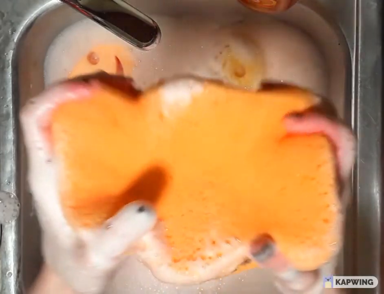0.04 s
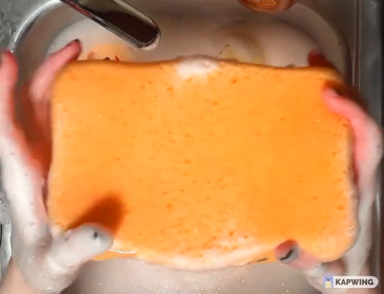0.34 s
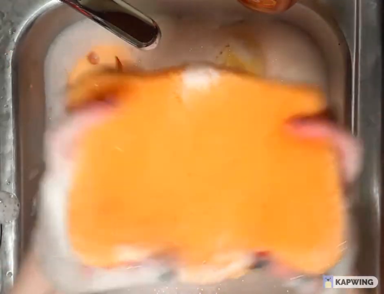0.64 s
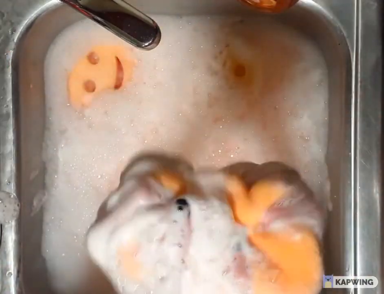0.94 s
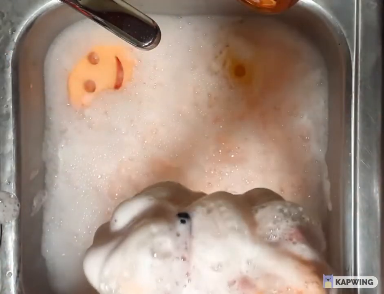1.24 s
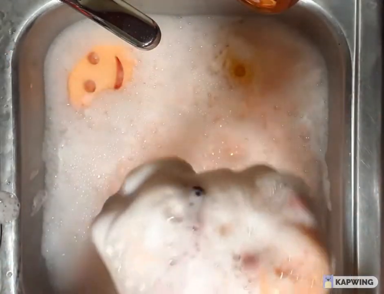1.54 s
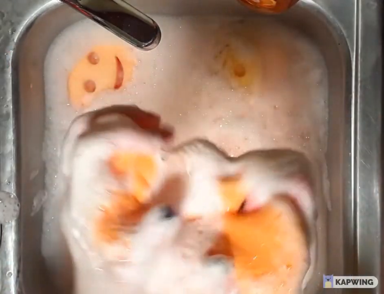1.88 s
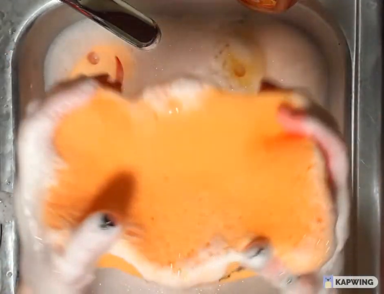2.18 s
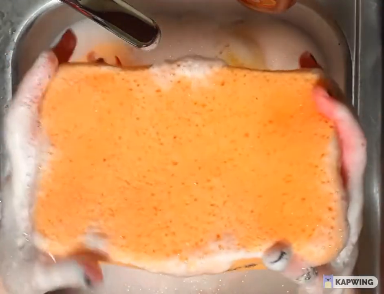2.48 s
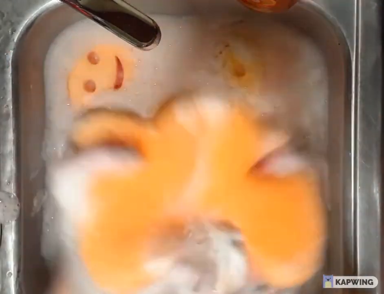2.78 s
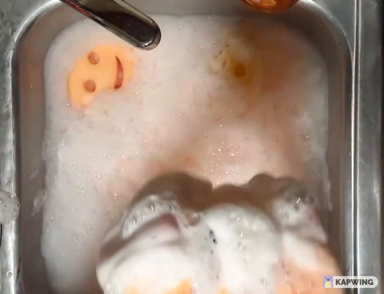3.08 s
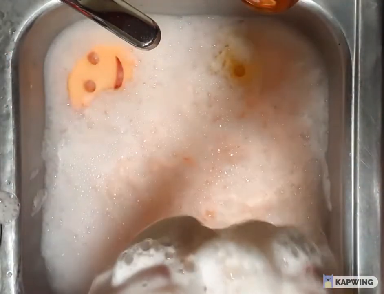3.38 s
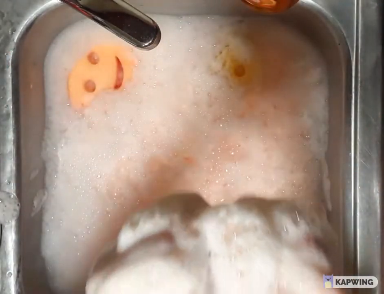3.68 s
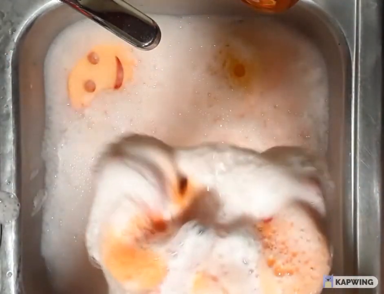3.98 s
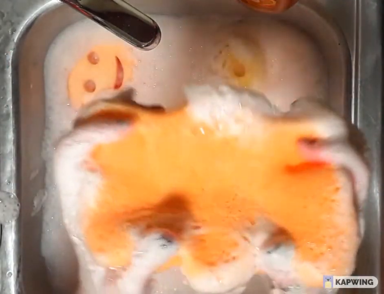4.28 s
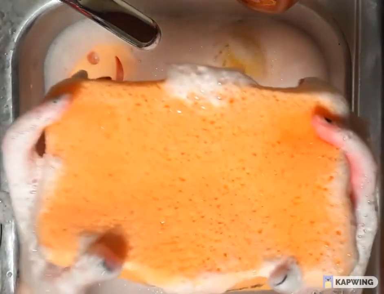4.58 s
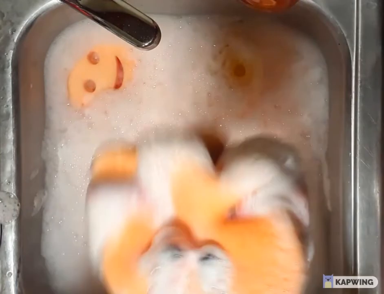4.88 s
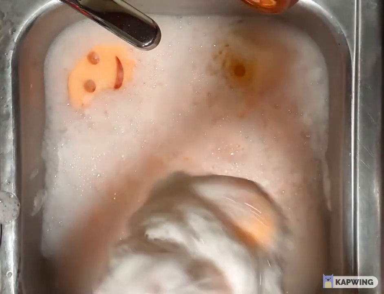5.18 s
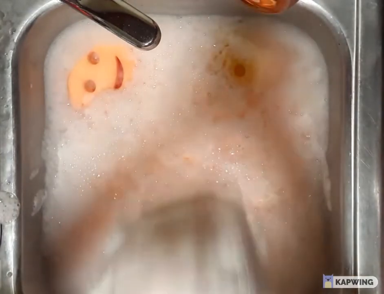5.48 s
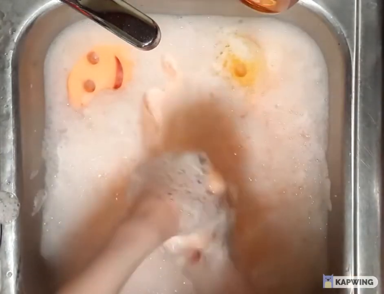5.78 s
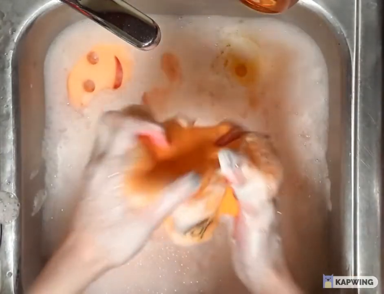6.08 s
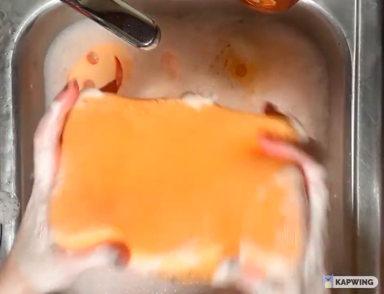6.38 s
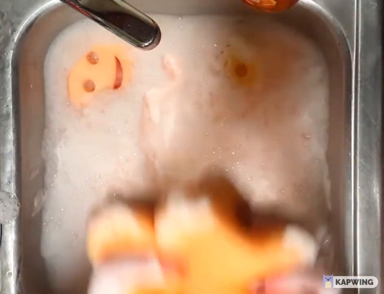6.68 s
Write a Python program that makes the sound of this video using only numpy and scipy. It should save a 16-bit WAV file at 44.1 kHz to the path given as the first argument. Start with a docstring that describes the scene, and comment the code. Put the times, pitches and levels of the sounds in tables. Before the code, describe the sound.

Close, wet squelches come about every two seconds as a sudsy sponge is pressed out four times above a steel kitchen sink. Foam fizzes and bubbles pop first, then water gurgles and fades. The sponge swells again with a quiet, crackly hiss after each of the first three squeezes. Small plops and tiny snaps fall in between, over a faint electrical hum and a little room echo.

```python
"""A soapy sponge is squeezed four times over a steel sink full of suds, and swells again in between.
Each squeeze drives out fizzing foam, then squelching bubbles and gurgling water: every bubble is a damped
oscillator, the smaller the higher. The swelling sponge sucks air with a soft hiss; once a wet fold whistles.
Air pockets burst, soap films snap and blobs of foam plop into the water. The basin's resonances colour
the sound, and a mains hum fills the slightly reverberant kitchen."""
import sys
import numpy as np
from scipy import signal
from scipy.fft import rfft, irfft, next_fast_len
from scipy.io import wavfile
from scipy.ndimage import map_coordinates

SR = 44100
rng = np.random.default_rng(int(sys.argv[2]) if len(sys.argv) > 2 else 0)


def put_to_file(sound):
    """Save the sound as 16-bit audio at rate SR, in the file named by the first command-line argument."""
    columns = np.atleast_2d(sound).T  # one column per channel
    safe = np.clip(columns, -1, 1)
    whole_steps = np.round(safe * 32767)
    wavfile.write(sys.argv[1], SR, whole_steps.astype(np.int16))


N = 306054
TIME = np.arange(N) / SR


def amp(db):
    """Amplitude ratio of a level in decibels."""
    return 10 ** (np.asarray(db) / 20)


def unit(x):
    """Normalisation to rms 1."""
    return x / np.sqrt(np.mean(x ** 2) + 1e-20)


def along(points, hz):
    """Interpolation of (frequency, value) points on a logarithmic frequency axis."""
    f, v = np.transpose(points)
    return np.interp(np.log(hz + 1), np.log(f + 1), v)


def wobble(rate):
    """Smooth random modulation: a spline through `rate` knots a second."""
    return map_coordinates(rng.standard_normal(int(N * rate / SR) + 4), [TIME * rate])


def noise():
    """Two independent channels of white noise."""
    return rng.standard_normal((2, N))


def filtered(x, response):
    """Linear filtering: the spectrum of x times a frequency response."""
    m = next_fast_len(N + SR // 2)
    return irfft(rfft(x, m) * response(np.fft.rfftfreq(m, 1 / SR)), m)[..., :N]


def band(hz, low_hz, high_hz, order=6):
    """Butterworth band-pass magnitude."""
    return 1 / np.sqrt((1 + (low_hz / (hz + 1)) ** (2 * order)) * (1 + (hz / high_hz) ** (2 * order)))


def held(start, end, attack_db_per_s, release_db_per_s):
    """Exponential growth until start, unit gain until end, then exponential decay."""
    early, late = np.maximum(start - TIME, 0), np.maximum(TIME - end, 0)
    return amp(-attack_db_per_s * early - release_db_per_s * late)


# stereo width: (frequency [Hz], side re mid [dB])
STEREO_WIDTH = [(120, -9.5), (260, -6.5), (520, -8), (720, 1), (900, -5.5), (1250, 4.5), (1700, -5.5),
                (2200, -1.5), (8700, 0), (9200, -9.5), (15000, -25)]
# stereo balance: (frequency [Hz], left re right [dB])
STEREO_BALANCE = [(120, 6), (450, 5.5), (750, 5.5), (1900, 2), (3500, 1), (8500, -2.5), (15000, -0.5)]
# resonances and notches of the basin: (frequency [Hz], width [Hz], gain [dB], left re right [dB])
BASIN_RESONANCES = [(431.4, 16, 5, 2), (616, 118, 3, 4), (725, 48, -1, -10), (860, 18, 4.5, -2),
                    (967, 26, 6.5, 4.5), (1147, 40, 5, 0), (1260, 51, 4.5, -9), (1385, 42, 4, 7.5),
                    (1679, 28, 5, -7), (1970, 90, -2.5, -8.5), (2149, 49, 2.5, 12), (2298, 45, 5, -3),
                    (2602, 73, 5, -2.5), (2805, 39, 8, 2.5), (3070, 58, 5.5, 4), (3390, 25, 5, 3.5),
                    (4150, 170, -2.5, -3), (4270, 92, 3, 2), (6030, 100, 0, 6), (7530, 280, -3, 3)]
def in_basin(pair, colour):
    """Resonant colouring: (mid, side), filtered by `colour`, meets the basin differently at each ear."""
    def spread(hz):
        angle = np.arctan(amp(along(STEREO_WIDTH, hz)))
        return colour(hz) * np.array([np.cos(angle), np.sin(angle)])

    def ears(hz):
        lift, lean = 0, along(STEREO_BALANCE, hz)
        for centre, width, db, pan in BASIN_RESONANCES:
            bell = np.exp(-((hz - centre) / width) ** 2)
            lift, lean = lift + db * bell, lean + pan * bell
        return amp([lift + lean / 2, lift - lean / 2])
    mid, side = filtered(pair, spread)
    return filtered(np.array([mid + side, mid - side]), ears)


# tones of the hum: (frequency [Hz], level [dB])
HUM_TONES = [(59.2, -60), (96.9, -72.5)]
# spectrum of the low rumble: (frequency [Hz], relative density [dB])
RUMBLE_SPECTRUM = [(20, -25), (45, -13), (70, -12.5), (105, 0), (135, -12), (190, -39.5), (500, -40.5)]
# spectrum of the room's faint rush: (frequency [Hz], relative density [dB])
RUSH_SPECTRUM = [(76, -23), (130, -12), (166, -4), (328, -8.5), (435, -13), (613, -8), (796, -22),
                 (974, -10), (1140, -1), (1520, -11.5), (1710, -17.5), (1970, -12), (4240, -43),
                 (9480, -38), (16000, -22.5)]
def kitchen():
    """Ambient noise: the line spectrum of an unsteady hum over continuous spectra of rumble and rush."""
    hum = 0
    for hz, db in HUM_TONES:
        peak = np.sqrt(2) * amp(db + 0.31 * wobble(8.4))
        hum += peak * np.sin(2 * np.pi * hz * TIME + 0.48 * wobble(3.09))
    rumble = unit(in_basin(noise(), lambda f: amp(along(RUMBLE_SPECTRUM, f))))
    rush = in_basin(noise(), lambda f: amp(along(RUSH_SPECTRUM, f)))
    rush = rush / np.std(rush.mean(axis=0)) * amp([[1.2], [-1.2]])
    return hum * amp([[2.3], [-3.2]]) + amp(-63) * rumble + amp(-67) * rush


def walls(x, t60=0.43):
    """Diffuse reverberation: convolution with a short, dull noise tail, different at each ear."""
    t = np.arange(SR // 3) / SR
    tail = rng.standard_normal((2, len(t))) * amp(-60 * t / t60) * (t > .004)
    echo = signal.fftconvolve(x, tail / np.linalg.norm(tail[0]), axes=1)[:, :N]
    return filtered(echo, lambda f: band(f, 80, 5900, order=2))


# pushes of the hands: (time [s], level [dB])
HAND_PUSHES = [(0.735, -41.5), (4.79, -49.5), (6.75, -41.5)]
def pushes(pitch_hz=104, rise_s=0.012):
    """Heavily damped oscillation: folding the sponge gives a soft, low bump."""
    bumps = np.zeros(N)
    for s, db in HAND_PUSHES:
        age = np.maximum(TIME - s, 0)
        envelope = age / rise_s * np.exp(1 - age / rise_s)
        bumps += amp(db) * envelope * np.sin(2 * np.pi * pitch_hz * age)
    return bumps * amp([[1.2], [-1.2]])


# modes of the filled sink: (frequency [Hz], level re the blob [dB], decay time T60 [s])
SINK_MODES = [(167.3, -22.5, 0.61), (215.7, -9, 0.17), (340.5, -11, 0.1), (502, -16, 0.23),
              (630, -19.5, 0.25), (748, -34, 0.14), (1030, -19, 0.14)]
# blobs falling into the water: (time [s], level [dB], cavity frequency [Hz], splash offset [dB])
FALLING_BLOBS = [(0.02, -52, 282, -3), (0.128, -56, 560, -9), (1.535, -47, 238, -13),
                 (1.655, -38.5, 239, -12), (1.714, -44, 227, -13), (1.737, -45.5, 162, -1),
                 (2.143, -54.5, 165, 2), (3.278, -43.5, 312, -6), (3.652, -55, 212, 7),
                 (5.635, -29, 317, -4), (5.67, -43, 480, -1.5), (5.843, -57, 334, 3)]
def plops(swell_cycles=1.07, rise=0.039):
    """Impact excitation: a blob slaps the suds, its cavity rings a few cycles and the sink answers."""
    ring, slap, spray = np.zeros((3, N + SR))
    t = np.arange(SR // 2) / SR
    onset = 1 - np.exp(-t / 0.0015)
    for s, db, hz, splash_db in FALLING_BLOBS:
        span = slice(int(s * SR), int(s * SR) + len(t))
        age = t * hz / swell_cycles
        cavity_phase = 2 * np.pi * hz * t * (1 + rise * np.tanh(age - 1))
        ring[span] += amp(db - 3) * age ** 2 * np.exp(2 * (1 - age)) * np.sin(cavity_phase)
        for mode_hz, mode_db, t60 in SINK_MODES:
            mode = np.sin(2 * np.pi * mode_hz * t + rng.uniform(0, 2 * np.pi))
            ring[span] += onset * amp(db + mode_db - 60 * t / t60) * mode
        slap[span] += onset * amp(db - 10.5 - 60 * t / 0.094)
        spray[span] += onset * amp(db + splash_db - 11.5 - 60 * t / 0.15)
    thud = slap[:N] * unit(filtered(noise(), lambda f: band(f, 130, 760, order=3)))
    splash = spray[:N] * unit(filtered(noise(), lambda f: band(f, 900, 4100, order=2)))
    centred_ring = np.outer([1, 0], ring[:N])
    return in_basin(centred_ring + thud + splash, lambda f: band(f, 110, 14000, order=3))


def bubbles(times, hz, strength, cycles, rise):
    """Bubble resonance as (mid, side): damped sines last `cycles` and glide up by the fraction `rise`."""
    life = (cycles / hz)[:, None]
    t = np.arange(int(min(life.max() * SR, 4e6 / len(hz)))) / SR
    age = np.minimum(t / life, 1)
    phase = 2 * np.pi * hz[:, None] * t * (1 + rise * age / 2)
    envelope = strength[:, None] * np.exp(-3 * age) * (1 - age) * (1 - np.exp(-phase / 2))
    index = ((np.abs(times) * SR).astype(int)[:, None] + np.arange(len(t))).ravel()
    leading_ear = rng.choice([-1, 1], (len(hz), 1))
    waves = np.sin(phase), leading_ear * np.cos(phase)
    return np.array([np.bincount(index, (envelope * wave).ravel(), N)[:N] for wave in waves])


# lone bubbles: (time [s], level [dB], frequency [Hz])
LONE_BUBBLES = [(0.992, -36, 840), (1.647, -52, 990), (2.891, -39, 427), (2.897, -30, 838),
                (2.902, -34.5, 651), (2.908, -31, 744), (4.289, -50, 920), (5.628, -40, 2100),
                (5.63, -37, 2510), (6.06, -54, 996), (6.096, -50, 990), (6.113, -50, 983)]
def blips():
    """Free oscillation: a single, lightly damped bubble rings with a clear pitch."""
    s, db, hz = np.transpose(LONE_BUBBLES)
    rings = bubbles(s, hz, amp(db), cycles=39, rise=0.05)
    return in_basin(rings, lambda f: band(f, 300, 9000, order=2))


# soap films snapping: (time [s], level [dB], treble offset [dB])
FILM_SNAPS = [(0.241, -44, -2), (1.106, -42, -8), (1.294, -40, -14), (3.655, -47.5, -10), (3.852, -39, -18),
              (4.103, -49, 3), (5.065, -33, -11), (5.21, -30, 1), (5.225, -33, -3), (5.25, -41, 12),
              (5.254, -35, 11), (5.262, -38, -9), (5.27, -40, -8), (5.2855, -34, 1), (5.302, -32, -4),
              (5.375, -38, -9), (5.63, -36, -9)]
def snaps(ring_hz=2620, ring_t60=0.016, ring_db=-11):
    """Impulse excitation: a film tears with a tiny spray and leaves a short ring in the basin."""
    t = np.arange(SR // 20) / SR
    burst = (1 - np.exp(-t / .0002)) * (amp(-60 * t / .008) + amp(-13 - 60 * t / .05))
    ring = amp(ring_db - 60 * t / ring_t60) * np.sin(2 * np.pi * ring_hz * t)
    body_band = signal.butter(2, [1400, 4500], "band", fs=SR, output="sos")
    pair = np.zeros((2, N + len(t)))
    for s, db, treble_db in FILM_SNAPS:
        tear = rng.standard_normal((2, len(t))) * burst
        snap = amp(-3) * signal.sosfilt(body_band, tear) + amp(treble_db - 11) * tear + ring
        pair[:, int(s * SR):int(s * SR) + len(t)] += amp(db) * snap
    return in_basin(pair[:, :N], lambda f: band(f, 700, 17000, order=2))


# air pockets bursting out of the sponge: (time [s], level [dB], centre frequency [Hz])
AIR_POCKETS = [(0.734, -16, 2230), (1.737, -31.5, 1310), (1.892, -27, 1410), (2.768, -29, 1650),
               (2.89, -21, 990), (2.9, -26, 720), (3.924, -24, 1650), (5.014, -26, 880), (5.035, -33, 800),
               (5.63, -29, 556), (6.849, -14, 2670), (6.861, -22, 2200)]
def spurts(count=24, length_s=.022, scatter=0.33, bubble_db=-23):
    """Fragmentation: each air pocket breaks into a quick cluster of resonating bubbles."""
    s, db, hz = np.repeat(AIR_POCKETS, count, axis=0).T
    delay = length_s * rng.random(len(s)) ** 1.1
    pitch_draw, level_draw = rng.uniform(-1.7, 1.7, (len(s), 2)).T
    strength = amp(db + bubble_db + 1.5 * level_draw)
    cluster = bubbles(s + delay, hz * np.exp(scatter * pitch_draw), strength, cycles=12, rise=.2)
    return in_basin(cluster, lambda f: band(f, 320, 9000, order=2))


def whistle(start_s=4.97, end_s=5.3, pitch_hz=2600, width_hz=75, level_db=-57, flutter_db=2):
    """Flow-excited resonance: air forced through a wet fold sings in a narrow, fluttering band."""
    mid, side = unit(filtered(noise(), lambda f: 1 / (1 + (2 * (f - pitch_hz) / width_hz) ** 2)))
    gate = held(start_s, end_s, attack_db_per_s=800, release_db_per_s=800)
    gain = amp(level_db + flutter_db * wobble(22)) * gate
    return gain * (mid + amp(-7) * np.array([side, -side]))


# colour of the wet foam: (frequency [Hz], gain [dB])
FOAM_COLOUR = [(150, -13.5), (250, -9), (340, -8.5), (520, -2.5), (900, 2), (1500, 2), (2700, -1),
               (4000, -4.5), (7000, -11), (8400, -7), (11700, -8.5), (16000, -17.5)]
def froth(low_hz, high_hz, per_second, cycles, rise, spread_db, blur_db):
    """Random superposition: bubbles of one size range ring over the blur of countless fainter ones."""
    when, pitch, chance = rng.random((int(per_second * N / SR), 3)).T
    hz = np.minimum(low_hz * (high_hz / low_hz) ** pitch, SR / 2)
    excess_db = spread_db * np.minimum(-np.log(1 - chance), 4)  # a few bubbles stand out
    rings = unit(bubbles(when * N / SR, hz, hz * amp(excess_db), cycles, rise))
    blur = unit(filtered(noise(), lambda f: band(f, low_hz, high_hz)))
    stream = in_basin(rings + amp(blur_db) * blur,
                      lambda f: amp(along(FOAM_COLOUR, f)) * band(f, low_hz / 2, high_hz * 2))
    return stream / np.std(stream.mean(axis=0))


# gushes: (time [s], level [dB], half length [s], slosh re the gush [dB], spray re the gush [dB])
WATER_GUSHES = [(0.04, -67.5, 0.051, -5, 7.5), (0.47, -67.5, 0.095, -14, -26), (0.99, -49, 0.012, -11, -12),
                (1.13, -51.5, 0.028, -21, -7), (2.909, -37, 0.024, -13, -24),
                (3.142, -48.5, 0.04, -25, -31), (3.856, -59, 0.023, -12, -4),
                (3.952, -52.5, 0.021, -18, -24), (4.02, -64, 0.023, -8, 6), (5.035, -38.5, 0.039, -20, -18),
                (5.255, -59.5, 0.04, -11, -1.5), (5.548, -56.5, 0.029, -20, -27), (5.65, -54, 0.02, 2, -2),
                (6.29, -73.5, 0.063, -18, 14), (6.755, -43, 0.025, -11.5, -2),
                (6.858, -41.5, 0.029, -13, -6)]
def gushing(squelch_db=-6):
    """Pulsed flow: sudsy water moves in Gaussian gushes; gains of (slosh, gurgle, squelch, fizz)."""
    gains = np.zeros((4, N))
    for s, db, half_s, slosh_db, spray_db in WATER_GUSHES:
        pulse = np.exp(-((TIME - s) / half_s) ** 2 / 2)
        gains += np.outer(amp(db + np.array([slosh_db, 0, squelch_db, spray_db])), pulse)
    return gains


# swellings of the sponge: (start [s], full [s], first level [dB], last level [dB],
# initial gurgle re the suction [dB], initial fizz re the suction [dB])
SPONGE_SWELLS = [(-0.3, 0.296, -60, -63, -0.5, -3.5), (1.724, 2.221, -56.5, -58.5, -4.5, -2),
                 (3.927, 4.38, -56, -57, -2, -2), (5.84, 6.28, -65.5, -58, -5, -0.5)]
def swelling(attack_db_per_s=285, release_db_per_s=94, pore_lag_s=0.031, drain_db=5, fizz_growth_db=1):
    """Elastic recovery: the sponge sucks, wet at first and ever drier; gains of (gurgle, squelch, fizz)."""
    gains = np.zeros((3, N))
    for start, full, first_db, last_db, gurgle_db, fizz_db in SPONGE_SWELLS:
        opened = np.clip((TIME - start) / (full - start), 0, 1)
        strength = amp(first_db + (last_db - first_db) * opened)
        suction = held(start, full, attack_db_per_s, release_db_per_s)
        pores = held(start + pore_lag_s, full, attack_db_per_s, release_db_per_s)
        lingering_foam = amp(-9.5) * held(full, full, attack_db_per_s, release_db_per_s=21.5)
        gurgle = suction * amp(gurgle_db - drain_db * opened)
        fizz = np.hypot(pores, lingering_foam) * amp(fizz_db + fizz_growth_db * opened)
        gains += strength * np.array([gurgle, suction, fizz])
    return gains


# flow pressed out of the sponge, one curve for each squeeze: (time [s], level [dB])
SQUEEZE_FLOWS = [
    [(0.58, -76), (0.672, -49.5), (0.744, -39.5), (0.874, -43.5), (0.964, -38), (1.088, -48),
     (1.124, -44.5), (1.252, -61.5), (1.294, -62.5), (1.446, -75), (1.5, -82)],
    [(2.65, -88), (2.682, -58), (2.732, -55), (2.766, -43), (2.84, -39), (2.882, -43.5), (2.89, -39.5),
     (3.046, -47), (3.15, -50.5), (3.39, -71.5), (3.5, -85)],
    [(4.7, -73.5), (4.774, -47), (4.82, -42.5), (4.828, -46), (5.022, -38), (5.084, -41.5), (5.108, -43.5),
     (5.308, -55.5), (5.312, -60), (5.36, -66)],
    [(6.56, -71), (6.606, -56.5), (6.838, -38), (6.934, -39), (6.94, -38)],
]
# change from air to water in each squeeze: (midpoint [s], length [s], fizz lost [dB], gurgle gained [dB])
AIR_TO_WATER = [(1.004, 0.45, 15, 4), (3.088, 0.28, 24, 10.5), (5.02, 0.11, 15, 3.5), (6.81, 0.12, 5, 3.5)]
def squeezing(airy_gurgle_db=-5.5, airy_fizz_db=0.5):
    """Two-phase flow: a squeeze expels airy foam first, then water; gains of (gurgle, squelch, fizz)."""
    gains = np.zeros((3, N))
    for curve, (turn_s, length_s, lost_db, gained_db) in zip(SQUEEZE_FLOWS, AIR_TO_WATER):
        s, db = np.transpose(curve)
        grip = held(s[0], s[-1], attack_db_per_s=400, release_db_per_s=127)
        flow = amp(np.interp(TIME, s, db)) * grip
        wet = (1 + np.tanh(2 * (TIME - turn_s) / length_s)) / 2
        gurgle = amp(airy_gurgle_db + gained_db * wet)
        fizz = amp(airy_fizz_db - lost_db * wet)
        gains += flow * np.array([gurgle, np.ones(N), fizz])
    return gains


def sponge(slosh_db=-14.5, squelch_db=-0.63, crackle_db=-3, trickle_db=-79, surge_db=0.6):
    """Resonance rises as bubbles shrink: big ones gurgle, small ones squelch, the finest foam fizzes."""
    coarse, medium, fine = np.hypot(squeezing(), swelling())  # independent flows add in power
    deep, coarse, medium, fine = np.hypot([amp(slosh_db) * coarse, coarse, medium, fine], gushing())
    coarse = np.hypot(coarse, amp(trickle_db))  # water never quite stops trickling
    slosh = froth(170, 342, per_second=160, cycles=4, rise=0.078, spread_db=2.5, blur_db=-11.5)
    gurgle = froth(390, 1650, per_second=1000, cycles=18, rise=.12, spread_db=2.6, blur_db=-5)
    squelch = froth(1600, 4300, per_second=2600, cycles=16, rise=.08, spread_db=2.8, blur_db=-4)
    crackle = froth(3880, 7500, per_second=1800, cycles=5.4, rise=.05, spread_db=1.5, blur_db=2.5)
    fizz = froth(7050, 18200, per_second=5200, cycles=3.1, rise=0.042, spread_db=1.5, blur_db=-0.5)
    # hard squeezing tears the finest films, so the fizz brightens as it grows
    finest = filtered(fizz, lambda hz: 1 - band(hz, 1, 10800))
    force = np.clip(20 * np.log10(fine / np.median(fine)) / 15, 0, 1)
    fizz = fizz + finest * (amp(5.6 * force - 2.5) - 1)
    surges = amp(surge_db * (wobble(55) + wobble(18)))
    return surges * (slosh * deep + gurgle * coarse + amp(squelch_db) * squelch * medium
                     + amp(crackle_db) * crackle * np.sqrt(medium * fine) + fizz * fine)


def scene():
    """Superposition of the direct sound from the sink, its reverberation and the kitchen's own noise."""
    sink = sponge() + whistle() + spurts() + snaps() + blips() + plops() + pushes()
    return sink + amp(-13) * walls(sink) + kitchen()


def record(dry):
    """Band limiting: an ideal low-pass filter removes the highest treble."""
    return filtered(dry, lambda hz: hz < 15850)


dry = scene()
out = record(dry)
put_to_file(out)
```